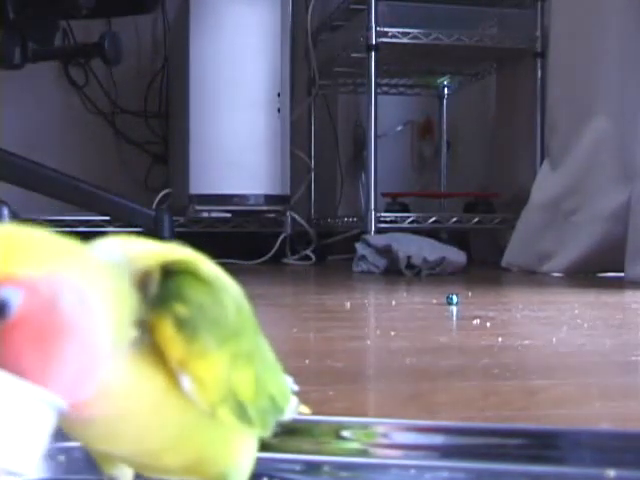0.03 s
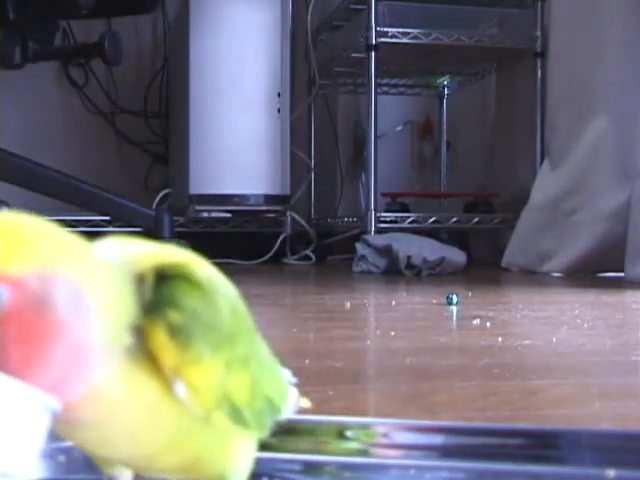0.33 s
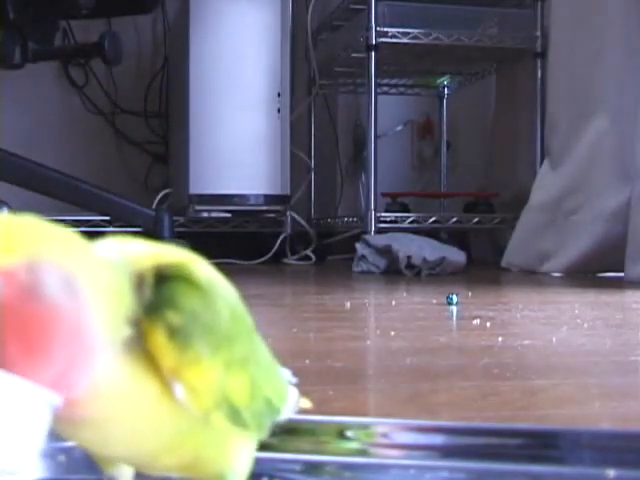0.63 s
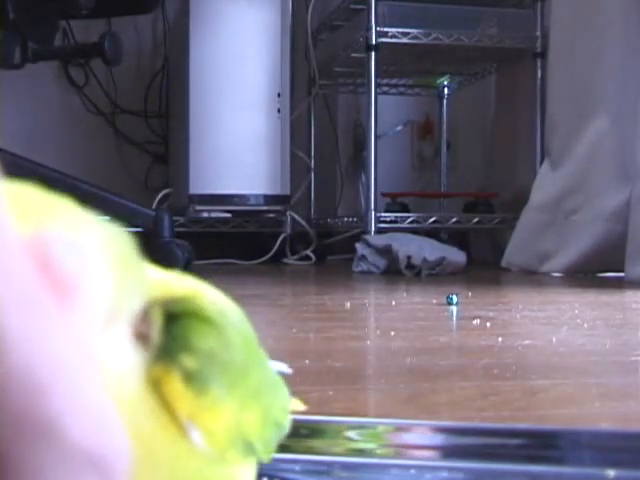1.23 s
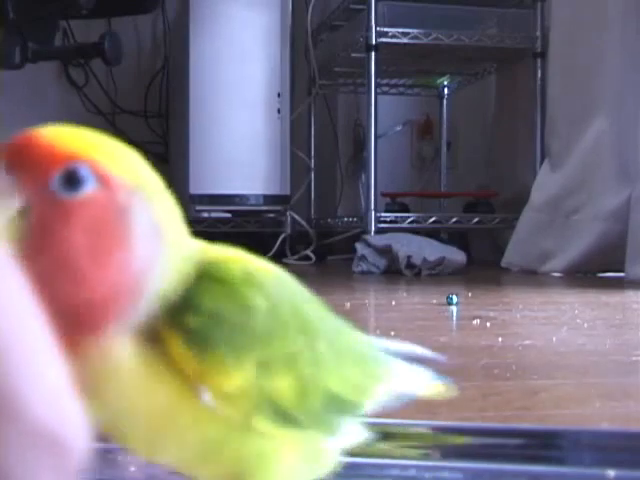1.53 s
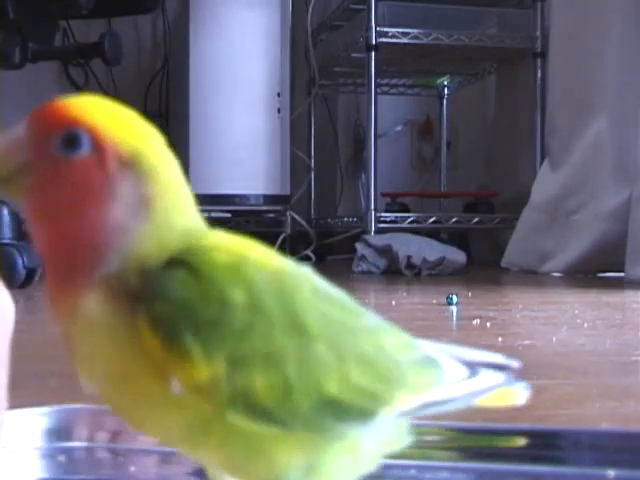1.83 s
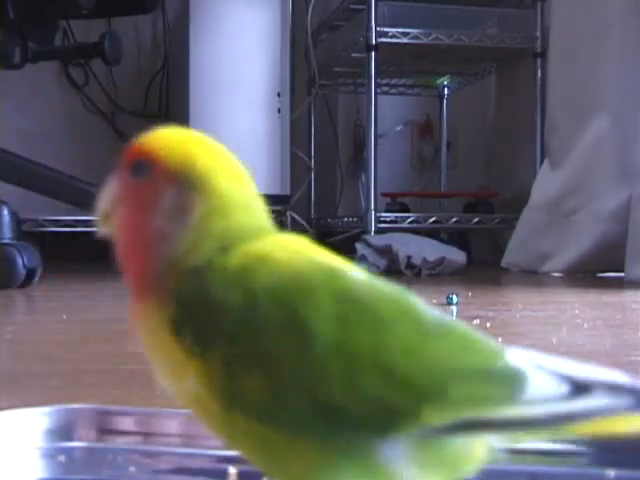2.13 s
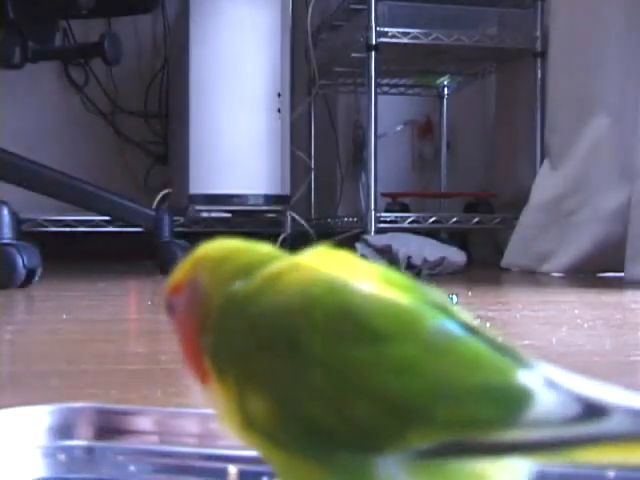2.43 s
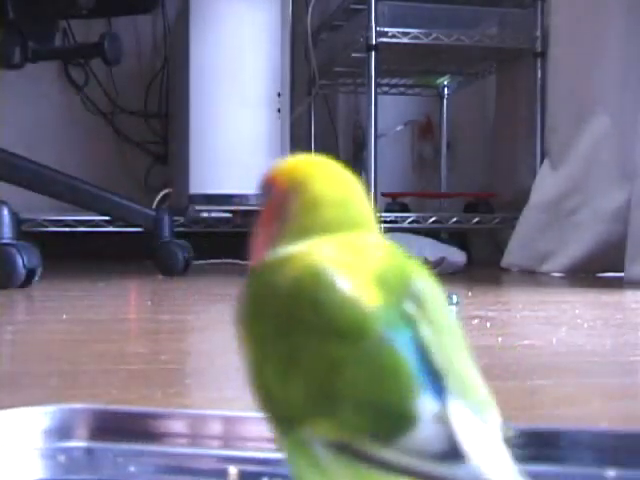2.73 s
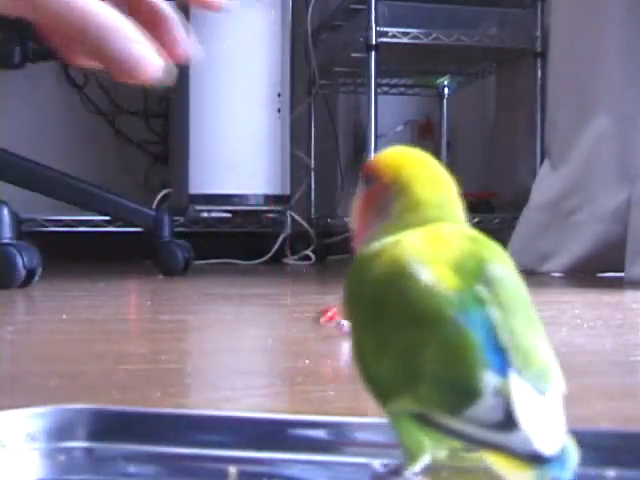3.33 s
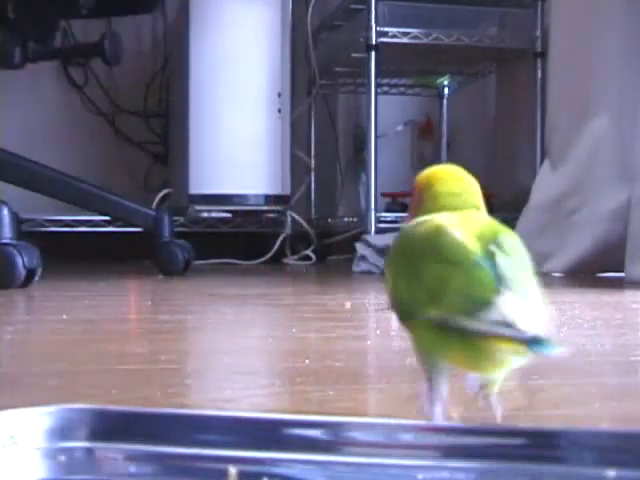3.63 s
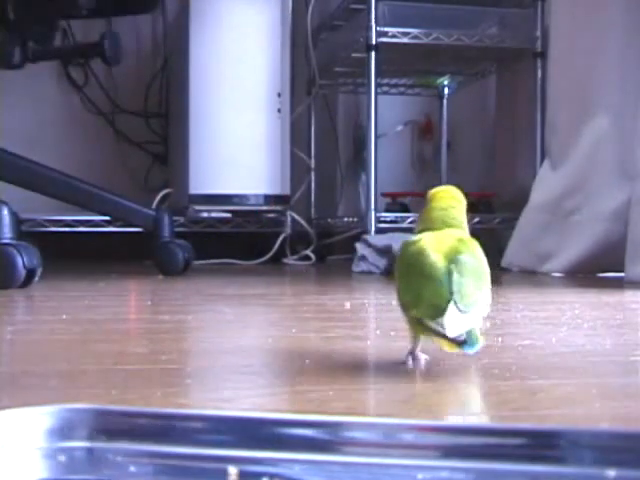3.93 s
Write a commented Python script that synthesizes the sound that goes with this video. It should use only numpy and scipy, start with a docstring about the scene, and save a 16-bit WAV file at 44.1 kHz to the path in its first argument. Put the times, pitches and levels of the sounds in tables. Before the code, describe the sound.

A small parrot's claws and beak click and scratch on a metal tray close to the microphone, after a few dull knocks. Then a little bell toy drops loudly, bouncing, rattling and jingling across a wooden floor in a quiet room.

```python
"""In a quiet room, handling beside a metal tray on a wooden floor makes dull, quickly damped knocks.
A small parrot steps about on the tray, close to the microphone: brief contacts of claws and beak
click and scratch. A short rub sets the tray ringing, and a little toy's bell tinkles in the hand.
Then the toy is dropped: it bounces, overloading the microphone, and rolls on the boards
while the pellet inside rattles and drives the bell's modes into a jingle."""
import sys
import numpy as np
from scipy import signal
from scipy.fft import rfft, irfft
from scipy.io import wavfile
from scipy.ndimage import uniform_filter1d

SR = 44100
rng = np.random.default_rng(int(sys.argv[2]) if len(sys.argv) > 2 else 0)


def master_out(mix):
    """Clip the mix to full scale and print it as 16-bit PCM to the path in sys.argv[1]."""
    frames = np.transpose(np.atleast_2d(mix))
    ceiling = np.clip(frames, -1, 1)
    pcm = np.round(ceiling * 32767).astype(np.int16)
    wavfile.write(sys.argv[1], SR, pcm)


N = 176400
T = np.arange(N) / SR
DROP_S = 3.394

# spectrum of a claw or beak on metal: frequency_hz, level_db
CLAW_SPECTRUM = [(100,-3),(600,-12),(1500,0.5),(2600,3.5),(4000,-1),(5500,0),(7000,1),(8500,-1),(12500,-1.5),(16000,-5)]
# the bell's three groups of modes: pitch_hz, level_db, t60_s
BELL_LOW_MODES = [(5945,-8,.25),(5986,0,.4),(6020,-15,.1),(7052,-26,.08),(9986,-27,.08)]
BELL_MID_MODES = [(13910,0,.25)]
BELL_HIGH_MODES = [(14700,-4,.15),(14750,0,.2),(14912,-4,.08)]
# modes of the wooden floor: pitch_hz, level_db, t60_s
BOARD_MODES = [(970,-5,0.0044),(1695,5,0.0082),(1946,1,0.0089),(2334,-2,0.015),(3460,-16,0.015),(4470,-26,0.0036)]


def amp(db):
    """Amplitude ratio of a level in decibels."""
    return 10 ** (np.asarray(db) / 20)


def unit(x):
    """Normalisation to rms 1."""
    return x / np.sqrt(np.mean(x ** 2) + 1e-20)


def unit_energy(x):
    """Normalisation to the energy of half a millisecond at full level."""
    return x / np.sqrt(np.mean(np.sum(x ** 2, axis=-1)) / (SR / 2000))


def at_hz(points, hz):
    """Interpolation on a log-frequency axis."""
    frequencies, values = np.transpose(points)
    return np.interp(np.log(hz + 1), np.log(frequencies), values)


def bandpass(x, order, low_hz, high_hz):
    """Butterworth band-pass filtering."""
    return signal.sosfilt(signal.butter(order, [low_hz, high_hz], "band", fs=SR, output="sos"), x)


def coloured(x, spectrum, tilt_db=0):
    """Minimum-phase filtering by a spectrum, tilted per octave about 4 kHz."""
    n = x.shape[-1]
    hz = np.fft.rfftfreq(n, 1 / SR)
    octaves = np.log2(np.maximum(hz, 500) / 4000)
    cepstrum = irfft(np.log(amp(at_hz(spectrum, hz) + tilt_db * octaves)), n)
    cepstrum[1:n // 2] *= 2  # folding makes the filter causal
    cepstrum[n // 2 + 1:] = 0
    return irfft(rfft(x) * np.exp(rfft(cepstrum)), n)


def diffuse(size):
    """A diffuse field: white noise, more coherent between the ears at low frequencies than at high."""
    # left-right likeness: frequency_hz, coherence
    likeness = [(50,0.48),(300,0.84),(1200,0.85),(2500,0.63),(5000,0.41),(8000,0.04),(15000,0.38)]
    coherence = at_hz(likeness, np.fft.rfftfreq(size, 1 / SR))
    mid, side = rfft(rng.standard_normal((2, size)))
    return unit(irfft(np.sqrt(1 + coherence) * mid + np.sqrt(1 - coherence) * side * [[1], [-1]], size))


def ring(x, modes):
    """Modal superposition: damped resonators share one driving force."""
    out = 0
    for hz, db, t60 in modes:
        radius = np.exp(-np.log(1000) / (t60 * SR))
        real = radius * np.cos(2 * np.pi * hz / SR)
        out = out + amp(db) * signal.lfilter([1, -real], [1, -2 * real, radius ** 2], x + 1e-18)
    return out


def add(out, start_s, sound):
    """Superposition of a sound from its start time."""
    i = max(int(start_s * SR), 0)
    out[..., i:i + sound.shape[-1]] += sound[..., :max(N - i, 0)]


def grains(per_s, spread_db):
    """A Poisson train of tiny contacts of uneven strength."""
    sizes = amp(spread_db * np.minimum(rng.exponential(1, N), 3)) * rng.choice([-1, 1], N)
    return sizes * (rng.random(N) < per_s / SR)


def pan(x, left_db):
    """A level difference between the ears leans a sound to the left."""
    return x * amp(np.array([[left_db], [-left_db]]) / 2)


def stroke(start_s, length_s, level_db):
    """The half-sine envelope of a sliding contact."""
    return amp(level_db) * np.sin(np.pi * np.clip((T - start_s) / length_s, 0, 1))


def after_drop(time_s, level_db):
    """An envelope, linear in decibels, that opens when the toy lands."""
    return amp(np.interp(T, time_s, level_db)) * (T > DROP_S)


def room(x, wet_db, t60_s=0.27, delay_s=0.00374, size=16384):
    """Reverberation: an exponentially decaying diffuse tail follows the direct sound."""
    t = T[:size]
    tail = diffuse(size) * np.exp(-np.log(1000) * t / t60_s) * (t > delay_s)
    return x + amp(wet_db) * signal.fftconvolve(x, unit(tail) / np.sqrt(size), axes=1)[:, :N]


def crack(spectrum, tilt_db, fall_s, rise_s=0.00017, size=2048):
    """A contact transient: a brief force gives a broadband burst."""
    t = T[:size]
    burst = diffuse(size) * (1 - np.exp(-t / rise_s)) * np.exp(-t / fall_s)
    return unit_energy(coloured(burst, spectrum, tilt_db))


def struck(hits, modes, crack_spectrum, fall_s, low_hz, top_hz, scatter, rise_s, size=2048):
    """Impact excitation: each blow cracks and rings the modes; contact time limits the treble."""
    out, impulse = np.zeros((2, N)), signal.unit_impulse(size)
    for start_s, level_db, tilt, crack_db in hits:
        varied_modes = [
            (hz * (1 + scatter * rng.normal()), db + tilt * np.log2(hz / modes[1][0]) + rng.normal(), t60)
            for hz, db, t60 in modes]
        high_hz = np.clip(top_hz * 2 ** (0.03 * level_db), 1400, 9000)  # soft blows are duller
        ringing = ring(impulse, varied_modes) * (1 - np.exp(-T[:size] / rise_s))
        body = unit_energy(bandpass(ringing, 4, low_hz, high_hz))
        add(out, start_s, amp(level_db) * (body + amp(crack_db) * crack(crack_spectrum, 0, fall_s)))
    return out


def room_air():
    """Stationary noise of room air and microphone hiss."""
    # noise spectrum: frequency_hz, relative_db
    spectrum = [(15, -28), (25, -13.5), (53, -8), (256, -1.5), (285, -4.5), (373, -9.5), (416, -1.5),
                (1020, -13), (1100, -7), (3160, -25), (3520, -23), (4870, -26), (10100, -25),
                (11900, -20.5), (16000, -33)]
    return amp(-46) * unit(coloured(diffuse(N), spectrum))


def handling_knocks():
    """Blows beside the tray excite heavily damped modes, heard as dull knocks."""
    # blows: start_s, level_db, tilt_db_per_octave, crack_db_re_body
    hits = [(.0278,-15.5,-4.5,-20),(.033,-33,-2,-25),(.0524,0.5,8,-16),(.068,-19,1,-1.5),(.947,-27,17,-4),(.9628,-9,-3,-10),(.9757,-26,0,-16),(1.0095,-28,-6,-18),
            (1.068,-14.5,-7.5,-18),(1.109,-27,-8,-11),(1.149,-26,-4,-15),(1.1715,-20.5,-1,-14.5),(1.178,-27,-2,-28),(1.200,-17.5,0,-13),(1.226,-21,8,-5.5),(1.230,-21,0,0),(1.234,-15,5,-14),(1.2395,-25,4,-22),
            (1.278,-33,-7,-5),(1.347,-28,-23,-19),(1.380,-26.5,-14,-12),(1.402,-33.5,-2,-2),(1.464,-27,-12,-10.5),(1.5035,-22.5,-4,-19),(1.610,-23.5,7,-6),(1.620,-17.5,-3,-5.5),(1.633,-25,-12,-7),(2.982,-30,20,-6)]
    # resonances of the knocked body: pitch_hz, level_db, t60_s
    modes = [(900,-10,0.027),(1080,2.5,0.021),(1471,12.5,0.014),(1670,3,0.018),(1750,-7,0.02),(2287,-3,0.032),(3070,-9,0.0046)]
    # contact spectrum: frequency_hz, level_db
    spectrum = [(100,7.5),(450,-1.5),(1200,-7.5),(2400,3),(3300,3),(4600,-1.5),(6200,0.5),(9000,-4.5),(16000,-7)]
    return amp(0.5) * struck(hits, modes, spectrum, fall_s=0.0061, low_hz=726, top_hz=2820,
                             scatter=0.022, rise_s=0.00047)


def microphone_kicks(fall_s=0.019, recover_s=0.071):
    """Overload recovery: hard hits push the microphone's offset down, and it swings back slowly."""
    # offset steps: start_s, right_level_db
    kicks = [(0.0507,-36),(2.656,-16.5),(3.3948,-14),(3.4201,-15.5),(3.4485,-18),(3.4828,-20),(3.547,-20)]
    offset = np.zeros(N)
    for start_s, level_db in kicks:
        add(offset, start_s, -amp(level_db) * np.exp(-T / fall_s))
    swing = signal.lfilter([1, -1], [1, -np.exp(-1 / (recover_s * SR))], offset)
    return swing * amp([[-6], [0]])  # weaker on the left


def claw_clicks(peak_db=8.5, width_octaves=0.34):
    """Hard, brief contacts of claws and beak give wide spectra, each with one resonant peak."""
    # contacts: start_s, level_db, tilt_db_per_octave, resonance_hz
    clicks = [(1.2143,-12.5,0,11100),(1.49,-27,8,13000),(1.505,-27,4,8600),(1.521,-34,5,13000),(1.620,-25,6,12000),(1.6327,-17.5,4.5,12500),(1.8005,-16.5,-4,6300),(1.827,-14.5,2.5,6360),(1.885,-29.5,-1.5,6300),(1.927,-28,-6.5,6400),
              (1.965,-32,4,12000),(1.993,-29,5.5,6500),(2.0838,-15.5,-2.5,12300),(2.4045,-23,1.5,10100),(2.407,-22,-2,12000),(2.5261,-3.5,0.5,5500),(2.532,-14.5,1,6000),(2.556,-31,-9,6000),(2.574,-30,-3,3000),(2.5856,-21,-3.5,8200),(2.628,-26.5,-8,3020),
              (2.653,-12.5,-1,2600),(2.655,2,-0.5,6170),(2.6697,-16,-2,7000),(2.6749,-13,-1,10000),(2.689,-21,0,7000),(2.696,-20,5,11000),(2.7085,-27,-1,5500),(2.723,-27,3,11500),(2.768,-30,-1.5,4500),(2.7743,-30.5,-0.5,5500),
              (2.8105,-23,4,10000),(2.815,-20.5,-0.5,11900),(2.823,-30,-3.5,12000),(2.8389,-27,0,9300),(2.9,-16,13,12000),(2.908,-16.5,0,9200),(2.9641,-30.5,-1,8000),(3.046,-21,-2,10400),(3.169,-15,4.5,10100),(3.1764,-14,3.5,11500),(3.185,-24,0,11000),(3.309,-18,-4.5,10300)]
    out, hz = np.zeros((2, N)), np.geomspace(100, 16000, 80)
    for start_s, level_db, tilt, resonance_hz in clicks:
        peak = peak_db * np.exp(-.5 * (np.log2(hz / resonance_hz) / width_octaves) ** 2)
        spectrum = np.c_[hz, at_hz(CLAW_SPECTRUM, hz) + peak]
        add(out, start_s, amp(level_db) * crack(spectrum, tilt, fall_s=0.0021))
    return out


def claw_scratches():
    """Friction noise: a claw sliding on metal makes a train of tiny clicks."""
    # strokes: start_s, length_s, level_db
    scratches = [(1.48,0.047,-42.5),(1.655,0.067,-34),(1.86,0.18,-45.5),(2.01,0.077,-40),(2.07,0.13,-44),(2.23,0.067,-48),(2.53,0.22,-42.5),(2.655,0.11,-40.5),(2.93,.05,-54)]
    contacts = grains(per_s=470, spread_db=3.3)
    click = crack(CLAW_SPECTRUM, tilt_db=0.7, fall_s=.0015)
    friction = signal.fftconvolve(contacts[None], click, axes=1)[:, :N]
    return sum(stroke(*row) for row in scratches) * unit(friction)


def tray_rub():
    """Frictional excitation: a short rub drives the tray's modes."""
    # tray resonances: pitch_hz, level_db, t60_s
    modes = [(737,-11,0.093),(1040,-14,0.023),(1571,-0.5,0.028),(1820,-4,0.0073),(2150,-13,0.016)]
    ringing = ring(grains(per_s=2500, spread_db=0.97), modes)
    return stroke(start_s=1.663, length_s=.048, level_db=-27.5) * unit(bandpass(ringing, 3, 600, 2500))


def bell_tinkles(t60_s=0.12):
    """Free vibration: the bell rings briefly after each nudge in the hand."""
    # impulses: start_s, level_db
    nudges = [(1.7982,-27.5),(1.882,-49),(1.925,-42),(3.202,-49)]
    force = np.zeros(N)
    for start_s, level_db in nudges:
        add(force, start_s, amp([level_db]))
    low = ring(force, [(hz, db, t60_s) for hz, db, _ in BELL_LOW_MODES])
    high = ring(force, [(hz, db, t60_s) for hz, db, _ in BELL_MID_MODES + BELL_HIGH_MODES])
    return pan(low + amp(-13) * high, left_db=6.0)


def toy_bounces():
    """Each impact of the toy excites the floor's modes; brighter impacts crack more."""
    # impacts: start_s, level_db, tilt_db_per_octave
    bounces = [(3.3929,4,2.5),(3.407,-21,1),(3.4201,1,1.5),(3.438,-6.5,6.5),(3.4483,-4.5,5),(3.481,-2.5,2),(3.515,-14.5,2),(3.522,-14,7.5),(3.547,-1,0.5),(3.558,-7,1),(3.5956,-10,-13),(3.603,-8.5,-10),
               (3.6265,-19,3),(3.6431,-14.5,-11),(3.649,-17,-11),(3.6661,-11,6.5),(3.685,-20,0),(3.7198,-13.5,-11),(3.741,-17.5,-14),(3.7674,-24,-15),(3.7893,-25,-10),(3.8056,-16.5,-10),(3.8186,-10,-2.5),
               (3.8689,-10.5,-9.5),(3.874,-20,-16),(3.884,-18,-1),(3.899,-24,-6),(3.9218,-14,-1),(3.95,-20,6),(3.958,-18.5,5),(3.980,-23,-11)]
    # contact spectrum: frequency_hz, level_db
    spectrum = [(100,-1.5),(500,-2),(1500,-7),(3500,7.5),(7000,3),(10000,-0.5),(16000,-6.5)]
    hits = [(start_s, level_db, tilt, -10 + 1.63 * tilt) for start_s, level_db, tilt in bounces]
    return struck(hits, BOARD_MODES, spectrum, fall_s=0.0018, low_hz=600, top_hz=4940,
                  scatter=0.045, rise_s=0.00014)


def toy_roll():
    """Rolling noise: many small contacts drive the modes of the boards."""
    # rolling envelope: time_s, level_db
    envelope = [(3.394,-28),(3.5,-56),(3.6,-40),(3.72,-35.5),(3.84,-36),(3.93,-32),(4,-32.5)]
    boards = ring(grains(per_s=350, spread_db=1.4), BOARD_MODES)
    return after_drop(*np.transpose(envelope)) * unit(bandpass(boards, 1, 800, 3500))


def pellet_rattle(fall_s=0.0026):
    """Random collisions of the pellet in the bell release noise whose energy decays exponentially."""
    # rattle envelope: time_s, level_db
    envelope = [(3.394,-19.5),(3.42,-20.5),(3.46,-26.5),(3.53,-31.5),(3.56,-28.5),(3.64,-28.5),(3.68,-30),(3.76,-34.5),(3.85,-37.5),(3.875,-27),(3.922,-39),(4,-33)]
    # collision spectrum: frequency_hz, level_db
    spectrum = [(100,-14.5),(600,3.5),(1500,-4),(3500,3.5),(5000,-0.5),(7000,2.5),(8500,-1),(12500,-8.5),(16000,-17)]
    energy = signal.lfilter([1], [1, -np.exp(-1 / (fall_s * SR))], grains(per_s=450, spread_db=5.9) ** 2)
    return after_drop(*np.transpose(envelope)) * unit(coloured(diffuse(N) * np.sqrt(energy), spectrum))


def sustained_ring(modes, per_s):
    """Forced vibration: pellet strikes keep up an even ring that wavers differently in each ear."""
    shared = grains(per_s, spread_db=2)
    ears = np.array([ring(shared + 0.86 * grains(per_s, spread_db=2.2), modes) for _ in range(2)])
    power = uniform_filter1d((ears ** 2).mean(0), size=700)
    return ears / np.sqrt(np.abs(power) + 1e-9)


def bell_jingle():
    """Closely spaced modes beat as the bell rolls, and each group swells and fades on its own."""
    # envelope of the ring near 6 kHz: time_s, relative_db
    low_envelope = [(3.394,-23),(3.421,-13),(3.46,-27),(3.49,-22.5),(3.52,-24),(3.54,-38.5),(3.559,-22),(3.58,-35),(3.598,-22),(3.63,-32.5),(3.675,-32.5),(3.696,-23),(3.72,-34.5),(3.745,-22),(3.765,-38),(3.786,-26),(3.84,-37),(3.865,-31.5),(3.889,-20),(3.94,-26.5),(4,-35)]
    # envelopes of the overtones near 13.9 and 14.8 kHz: time_s, mid_db, high_db
    overtones = [(3.394,-38,-26),(3.42,-37,-24),(3.44,-22,-31),(3.52,-33,-28),(3.56,-33,-31),(3.64,-38,-35),(3.69,-52,-39),(3.75,-47,-26.5),(3.80,-44.5,-42),(3.86,-61,-42),(3.88,-49,-26),(3.935,-58,-43),(3.955,-52,-29),(4,-58,-41)]
    time_s, mid_db, high_db = np.transpose(overtones)
    low = after_drop(*np.transpose(low_envelope)) * sustained_ring(BELL_LOW_MODES, per_s=250)
    mid = after_drop(time_s, mid_db) * sustained_ring(BELL_MID_MODES, per_s=290)
    high = after_drop(time_s, high_db) * sustained_ring(BELL_HIGH_MODES, per_s=340)
    return amp(2.05) * pan(low, left_db=2.0) + mid + high


def scene():
    """Superposition of all sources at the microphone."""
    handling = room(pan(handling_knocks() + tray_rub(), left_db=2.7), wet_db=-9.5, t60_s=0.15)
    parrot = room(pan(claw_clicks() + claw_scratches(), left_db=2.0), wet_db=-15)
    toy = room(pan(toy_bounces() + toy_roll() + pellet_rattle(), left_db=0.3), wet_db=-11.5)
    bell = bell_tinkles() + bell_jingle()
    return room_air() + handling + microphone_kicks() + parrot + bell + toy


def record(dry, cutoff_hz=15250):
    """Saturation clips the peaks at full scale; a steep low-pass limits the bandwidth."""
    return signal.sosfilt(signal.ellip(10, .2, 70, cutoff_hz, fs=SR, output="sos"), np.clip(dry, -1, 1))


dry = scene()
out = record(dry)
master_out(out)
```